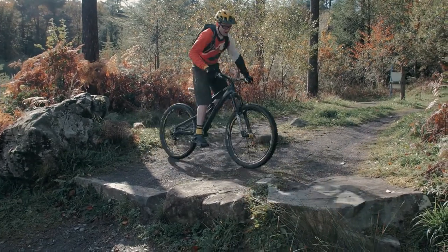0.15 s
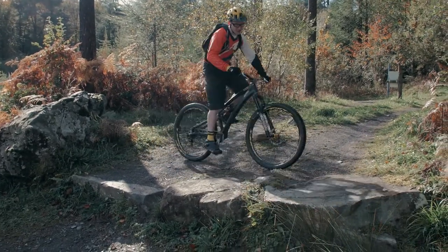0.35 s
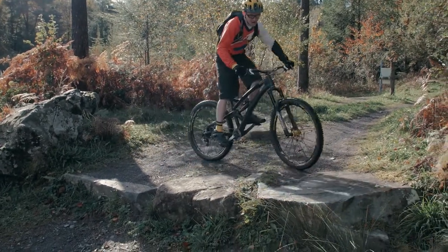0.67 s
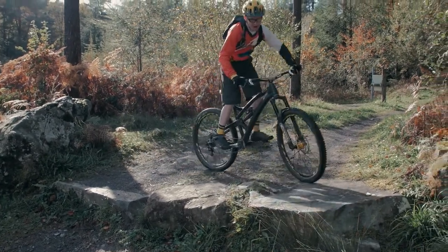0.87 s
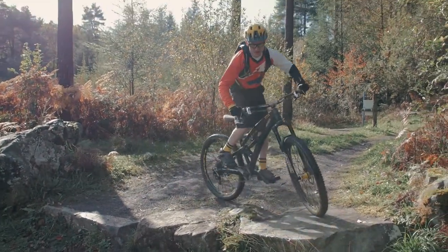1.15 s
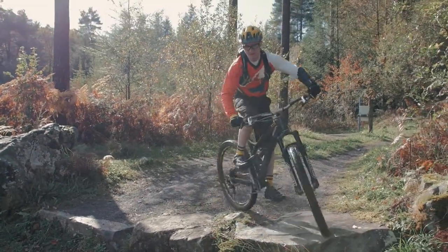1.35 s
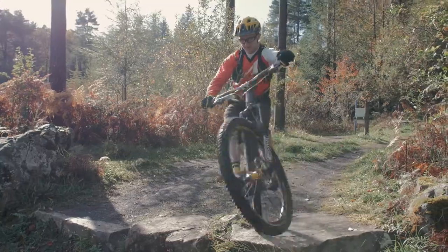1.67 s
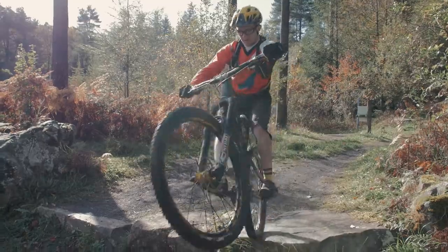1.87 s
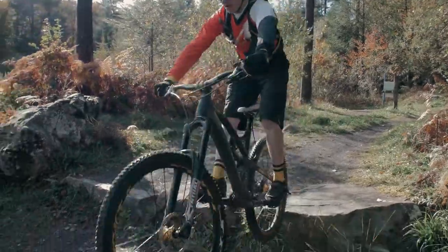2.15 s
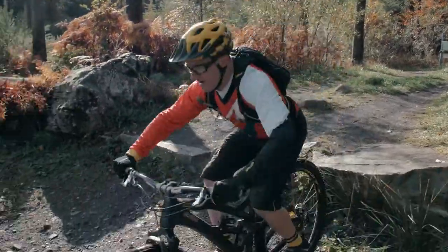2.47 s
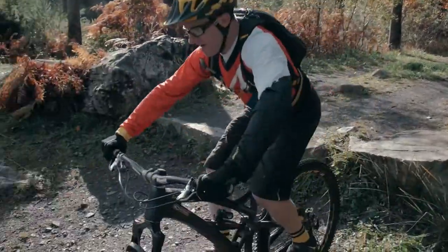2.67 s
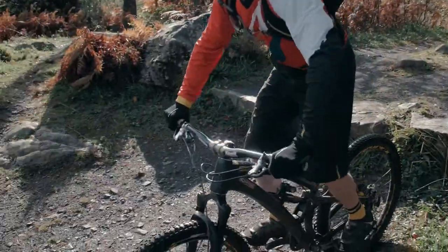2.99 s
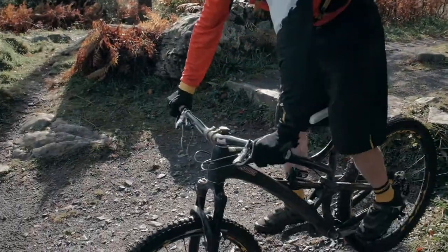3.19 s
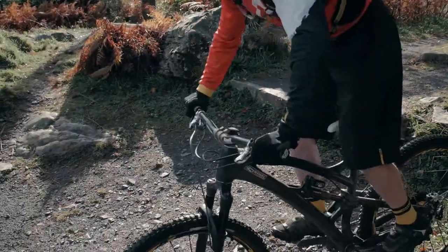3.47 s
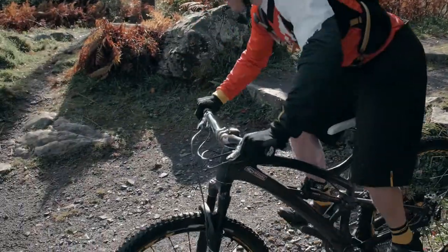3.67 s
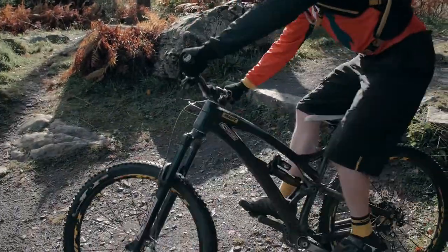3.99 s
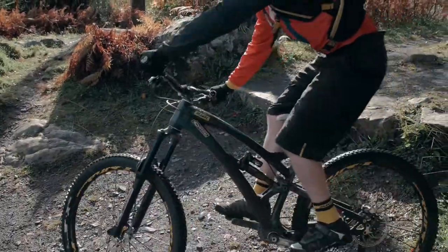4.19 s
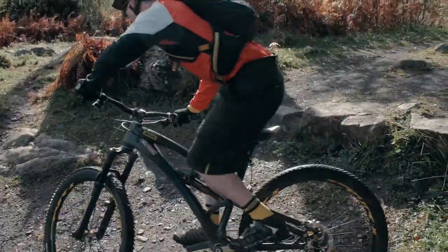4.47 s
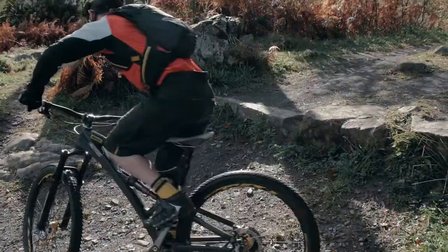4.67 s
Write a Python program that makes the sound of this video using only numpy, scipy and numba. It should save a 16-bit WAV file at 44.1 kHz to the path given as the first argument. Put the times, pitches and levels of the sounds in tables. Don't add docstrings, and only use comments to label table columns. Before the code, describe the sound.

Close outdoor pickup of a mountain bike on a rocky trail: fine gritty crackle and popping stones first, rapid faint freehub ticks, then a loud landing crack and thud with a quarter-second brake squeal. Afterwards the bike stumbles with several hard woody-metallic knocks, sparse gravel, a squeezed pebble, quick brake chirps, and soft tyre crunch. Faint air and leaves behind, little echo.

```python
import sys
import numpy as np
from scipy import signal
from scipy.fft import rfft, irfft
from scipy.io import wavfile
from scipy.ndimage import uniform_filter1d
from numba import njit

SR = 44100
rng = np.random.default_rng(int(sys.argv[2]) if len(sys.argv) > 2 else 0)


def wav_record(signal):
    frames = np.transpose(np.atleast_2d(signal))
    bounded = np.clip(frames, -1, 1)
    quanta = np.round(bounded * 32767).astype(np.int16)
    wavfile.write(sys.argv[1], SR, quanta)


def level_to_linear(level):
    exponent = np.asarray(level, float) / 20
    return 10 ** exponent


N = 213175
TIME = np.arange(N) / SR


def level(x, db):
    return x * level_to_linear(db) / np.sqrt(np.mean(x ** 2))


@njit
def svf(x, hz, width):
    y, b, l = np.empty(len(x)), 0., 0.
    g, k = np.tan(np.pi * hz / SR), width / hz
    for i in range(len(x)):
        v = (b + g * (x[i] - l)) / (1 + g * (g + k))
        b, l, y[i] = 2 * v - b, l + 2 * g * v, k * v
    return y


def band(x, hz, width):
    return svf(x, float(np.clip(hz, 15, .45 * SR)), float(max(width, 1)))


def band_twice(x, hz, width):
    return band(band(x, hz, width), hz, width)


def walk(rate, count=N):
    hold = int(SR / rate)
    steps = np.repeat(rng.standard_normal(count // hold + 1), hold)
    return 1.57 * uniform_filter1d(uniform_filter1d(steps, hold), hold)[:count]


def decay(t, t60):
    return np.exp(-np.log(1000) * t / t60)


def add(out, s, x):
    i = int(s * SR)
    out[i:i + len(x)] += x[:N - i]


def burst(t60, db, *bands, rise=.0006, blow=0., contact=1e-5):
    t = TIME[:int(SR * min(.2, 1.2 * t60 + .06))]
    push = rng.standard_normal(SR // 5)[:len(t)] * decay(t, max(t60, .002))
    push *= np.minimum(t / max(rise, 1e-4), 1)
    push += blow * np.exp(-((t - rise) / max(contact, 1e-5)) ** 2)
    push = np.convolve(push, signal.windows.hann(int(2 * contact * SR) + 3), "same")
    y = 0
    for k, (hz, width, gain_db) in enumerate(bands):
        y = y + (-1) ** k * level_to_linear(gain_db) * band(push, hz, width) / np.sqrt(width)
    return y * level_to_linear(db) / np.abs(y).max()


# pitch in Hz, level in dB per Hz.
WOOD_TONE = [(12, -29), (20, 20.5), (43, 9), (198, -7.5), (310, -13), (607, 4.5), (1570, -8.5), (3840, -25),
             (6720, -53), (8180, -9), (10500, -56), (13500, -51), (16000, -18)]


def wood():
    out, (f, g) = 0, np.transpose(WOOD_TONE)
    for hz in 22 * 2 ** np.arange(0, 9.6, .5):
        gust = np.clip(3.5 - np.log2(hz / 22), 1, 4) * 0.5 * walk(2.23)
        db = np.interp(np.log(hz), np.log(f), g) + gust
        out = out + level_to_linear(db) * band_twice(rng.standard_normal(N), hz, 0.43 * hz)
    return level(out, -54)


def grit(rate):
    size = level_to_linear(2.7 * np.minimum(rng.exponential(size=N), 3.6)) * rng.standard_normal(N)
    return level(size * (rng.random(N) < rate / SR), 0)


# time in seconds, load on the grit in dB, coarseness in dB.
ROLLING = [(0, -48.5, 2), (.142, -51, -1.5), (.286, -49.5, 5.5), (.5, -47, -3.5), (.86, -51, 4),
           (.99, -53.5, -2), (1.3, -50, -3), (1.47, -50.5, 0.5), (1.56, -55, -3), (1.96, -53, 0),
           (2.36, -58, 1.5), (2.8, -59.5, 8), (2.95, -49, 2), (3.3, -53, 0), (3.7, -48, 0),
           (4.1, -67.5, 15), (4.45, -48.5, -2.5), (4.83, -45.5, 2)]
# start in seconds, length in seconds, level in
# dB, coarseness in dB.
TREAD_SKIDS = [(0.228, 0.14, -61, -18), (.7, 0.16, -49.5, -7), (1.3, 0.2, -56, -5), (2.462, 0.3, -51, 13.5),
               (4.13, 0.019, -63, 5), (3.254, 0.03, -50, -3), (2.381, 0.026, -37, 13.5),
               (2.44, 0.075, -45, 16), (2.565, .16, -35.5, 2), (2.76, 0.017, -43, 7.5),
               (1.587, 0.3, -46.5, -3), (3.408, 0.13, -49, -2), (3.493, 0.076, -46, -8),
               (3.72, 0.13, -42, -1.5), (3.77, 0.099, -51.5, 19.5), (4.303, 0.055, -61, 23.5),
               (4.538, 0.14, -45, 4), (4.718, 0.042, -39, -2.5)]
# pitch in Hz, width in Hz, grains per second.
GRAIN_SIZES = [(363, 620, 1800), (1120, 1260, 700), (3420, 2250, 1100), (7400, 2400, 3900),
               (12800, 5000, 4600)]
# level in dB, share of the coarseness.
SIZE_LEVELS = [(-8, 1.4), (-0.9, 0.79), (-2.74, -0.83), (-12, 0.29), (-15.5, 0.43)]
SKID_SIZE_DB = [-5.5, 0.5, -1.2, 4, -1]


def tyres():
    s, load_db, coarse_db = np.transpose(ROLLING)
    common, bumps, out = grit(700), 1.1 * walk(35), 0
    near_db = 5 * np.tanh((TIME - 1.15) / 0.13)
    skid_rise_s, skid_fall_s = 0.013, 0.051
    for k, ((size_db, share), (hz, width, rate)) in enumerate(zip(SIZE_LEVELS, GRAIN_SIZES)):
        grains = grit(rate) + 0.46 * common + 0.83 * rng.standard_normal(N)
        tone = band_twice(grains, hz, 1.96 * width)
        force = level_to_linear(np.interp(TIME, s, load_db + share * coarse_db) + near_db * (k == 0))
        for start, length, db, rough_db in TREAD_SKIDS:
            rise, fall = (TIME - start) / skid_rise_s, (start + length - TIME) / skid_fall_s + 1
            shape = np.clip(np.minimum(rise, fall), 0, 1)
            force = np.hypot(force, shape * level_to_linear(db + share * rough_db + SKID_SIZE_DB[k]))
        out = out + level(tone, size_db) * force * level_to_linear(bumps + .9 * walk(18))
    return out


# start in seconds, peak in dB, pitch in Hz.
GRIT_CHIPS = [(0.004, -31, 1180), (0.016, -27, 2150), (0.037, -30, 1610), (0.113, -28, 1144),
              (0.17, -37, 1480), (0.184, -40, 3500), (0.252, -25, 1010), (0.271, -28, 3110),
              (0.325, -32, 1530), (0.349, -26, 3630), (0.359, -29, 3100), (0.388, -25, 3180),
              (0.496, -21, 1860), (0.625, -39, 2960), (0.698, -29, 1750), (0.733, -33, 3500),
              (0.75, -25, 3160), (0.854, -29, 1130), (0.87, -32, 3490), (0.888, -30, 3270),
              (0.923, -29, 3750), (0.979, -34, 4200), (1.008, -34, 1880), (1.094, -38, 966),
              (1.118, -32, 3000), (1.152, -31, 3990), (1.195, -37, 1100), (1.267, -34, 1280),
              (1.389, -24.5, 4810), (1.447, -29, 1450), (1.61, -30.5, 1150), (1.725, -32, 2600),
              (1.818, -27, 2850), (1.899, -38, 2560), (2.073, -27, 1390), (3.285, -30, 2050),
              (3.314, -42, 918), (3.401, -30, 1990), (3.413, -26, 2460), (3.445, -33, 2570),
              (3.465, -29, 2030), (4.605, -27, 991), (4.69, -28, 1800), (4.754, -25, 2050)]


def chips():
    out = np.zeros(N)
    for s, db, hz in GRIT_CHIPS:
        add(out, s, burst(0.015, db - 6, (hz, 0.27 * hz, 0), blow=1.4))
        snap = burst(.004, db - 13.5, (3400, 3600, 0), (9000, 6000, -14), rise=0.00019, blow=13.0)
        add(out, s, snap)
    return out


# start in seconds, peak in dB, pitch in Hz, sharpness in dB.
LEDGE_STONES = [(0.096, -28.5, 1130, -5), (0.238, -32, 1440, -3), (0.293, -32.5, 1130, 8.5),
                (0.414, -27.5, 3320, -18), (0.513, -23, 1980, 0), (0.541, -35, 1206, 0),
                (0.565, -25.5, 3450, -12), (0.657, -27, 3070, -18), (0.71, -30.5, 1230, -15),
                (0.806, -26.5, 3360, -10), (0.842, -26, 1160, -3), (0.909, -27.5, 3780, -11),
                (1.061, -33.5, 3400, -1), (1.24, -37, 1325, 8.5), (1.295, -31.5, 1120, -14),
                (1.346, -26, 1820, 6.5), (1.414, -44, 2830, 16), (1.472, -31.5, 1560, 5),
                (1.525, -28.5, 4100, -19), (1.596, -31, 2550, -11), (1.641, -31, 1280, 3.5),
                (1.736, -25, 2560, 5), (1.764, -25, 5200, -8), (1.8, -25.5, 3630, 0),
                (1.858, -26.5, 4470, -11), (1.878, -24, 1050, -16), (1.914, -29, 1560, 5.5),
                (2.054, -25.5, 2050, -0.5), (2.136, -28, 1430, -5), (2.165, -27, 4000, -14)]
# start in seconds, peak in dB, pitch in Hz, sharpness in dB.
LOWER_STONES = [(2.286, -34.5, 966, -28), (2.764, -24, 1110, -19), (2.864, -30.5, 2550, -11),
                (2.884, -31, 2740, -8), (2.79, -27.5, 2220, -6), (3.059, -25, 1450, -18),
                (3.119, -22, 640, -26.5), (3.271, -39, 2420, 6), (3.299, -41, 614, 5),
                (3.476, -28.5, 1900, -20.5), (3.675, -36.5, 1400, 9), (3.809, -28, 1300, -2.5),
                (3.82, -25, 2570, -9), (3.83, -19, 1290, -9.5), (3.835, -26, 1510, -16),
                (3.842, -30, 2400, -8), (3.847, -40, 1900, -6), (4.464, -28.5, 774, -1),
                (4.509, -25.5, 2640, -9), (4.524, -30.5, 800, 7), (4.579, -26, 2100, -1),
                (4.739, -26.5, 2010, 7)]


def stones():
    out = np.zeros(N)
    for table, t60, gain_db in ((LEDGE_STONES, 0.043, -4), (LOWER_STONES, 0.056, -2.1)):
        for s, db, hz, sharp_db in table:
            add(out, s, burst(t60, db + gain_db, (hz, 0.27 * hz, 0), blow=7.9))
            snap_db = db + 1.5 + sharp_db
            add(out, s, burst(.004, snap_db, (3500, 3500, 0), (9000, 6000, -18), rise=0.00017, blow=5.6))
    return out


# start in seconds, peak in dB, pitch in Hz, time to die by 60 dB in seconds.
PEBBLE = [
    (3.857, -23.5, 3950, 0.021),
    (3.87, -30, 4300, 0.05),
    (3.875, -28, 4400, 0.031),
    (3.883, -32, 5400, 0.046),
    (3.89, -37, 5840, 0.06),
    (3.893, -49.5, 7840, .03),
    (3.893, -39, 3770, 0.035),
]


def pebble():
    out = np.zeros(N)
    for s, db, hz, t60 in PEBBLE:
        add(out, s, burst(t60, db, (hz, 0.042 * hz, 0), rise=0.0011))
    return out


# start in seconds, peak in dB, pitch in Hz.
MORE_PAWL_TICKS = [(3.0624, -36, 9100), (3.943, -42, 8740), (3.9938, -45, 12400), (4.0033, -46, 12700),
                   (4.027, -32, 13000), (4.0582, -47, 8670), (4.0886, -48, 9530), (4.0954, -44, 8500),
                   (4.2213, -41, 12700), (4.2344, -57, 8820), (4.3131, -50, 8790), (4.3321, -45, 8900),
                   (4.3929, -56, 8690), (4.426, -37, 8300), (4.4794, -45, 9100), (4.5704, -52, 8520),
                   (4.6074, -42, 8690)]


def more_pawls():
    out = np.zeros(N)
    for s, db, hz in MORE_PAWL_TICKS:
        add(out, s, burst(0.018, db - 2.5, (hz, 1500, 0), (13000, 5000, -1.5), (6000, 4000, -9)))
    return out


# start in seconds, peak in dB.
FREEHUB_TICKS = [(1.951, -43), (1.9767, -43), (2.014, -45), (2.053, -42), (2.0832, -43), (2.1116, -43),
                 (2.142, -44), (2.173, -47.5), (2.2039, -42), (2.239, -40), (3.6037, -40), (3.64, -40),
                 (3.683, -36), (3.7155, -36)]


def freehub():
    out = np.zeros(N)
    for s, db in FREEHUB_TICKS:
        add(out, s, burst(0.057, db + 2.0, (8600, 1800, -7), (13200, 4500, 3), (4500, 4000, -12)))
    return out


# start in seconds, peak in dB, pitch in Hz.
SOFT_BUMPS = [(0.018, -51, 122), (1.368, -61, 528), (1.496, -50.5, 163), (1.549, -42, 570),
              (1.611, -46, 330), (1.874, -43.5, 256), (1.98, -55, 630), (2.135, -45, 314),
              (2.163, -40, 600), (2.204, -45, 369), (2.639, -22.5, 564), (3.165, -34.5, 505),
              (3.239, -42, 549), (3.366, -44, 748), (3.386, -43, 664), (3.799, -41, 583), (4.613, -40, 480)]
# start in seconds, peak in dB, pitch in Hz, time to die by 60 dB in seconds.
TYRE_THUMPS = [
    (2.386, -28, 67, 0.17),
    (2.394, -14.5, 254, 0.05),
    (4.302, -33.5, 108, 0.092),
    (4.746, -36.5, 124, 0.2),
]


def thumps():
    out = np.zeros(N)
    for s, db, hz, t60 in TYRE_THUMPS:
        add(out, s, burst(t60, db, (hz, .5 * hz, 0), rise=0.00287, blow=12, contact=0.001))
    for s, db, hz in SOFT_BUMPS:
        add(out, s, burst(.05, db + 2.5, (hz, 0.18 * hz, 0), rise=0.0025, blow=4.1, contact=0.00027))
    return out


# start in seconds, peak in dB, pitch in Hz, thud in dB, crack in dB.
LANDING_BLOWS = [(2.373, -25.5, 668, -10, -12), (2.39, -9.5, 586, -20, -40.5),
                 (2.418, -0.5, 1640, -38, -13), (2.684, -8, 860, -34, -26), (2.701, -18, 1200, -30, -1),
                 (2.707, -11.5, 1880, -45, -6.5), (2.712, -25, 2300, -40, -15),
                 (2.735, -15, 1710, -42, -10), (2.739, -21.5, 555, -37, -2), (4.021, -25, 550, -25, -8),
                 (4.29, -22, 554, -26, -34), (4.313, -21.5, 1600, -11, -13), (4.736, -32, 2000, -6, 0)]
# start in seconds, peak in dB, pitch in Hz, thud in dB,
# crack in dB.
FRAME_KNOCKS = [(2.975, -5.5, 1185, -35, -14.5), (3.077, -27, 534, -33, -11.5),
                (3.084, -1, 1260, -52, -9.5), (3.187, -25.5, 330, -18, -11.5), (3.555, 0.5, 1080, -53, -10),
                (3.734, -25.5, 666, -14, -2.5), (3.781, 0.5, 1110, -58, -1), (3.86, -17, 1390, -32, -24),
                (3.895, -47, 1390, -22, -16), (4.039, -31.5, 484, -39, -25), (4.124, -20.5, 1490, -34, -13),
                (4.145, -24, 525, -33, -31.5)]
# pitch in Hz, width in Hz, level in dB.
FRAME_TUBES = [(939, 115, -0.5), (1263, 14, -19), (1465, 57, -4), (2950, 720, 0), (800, 70, -16.5),
               (4080, 68, -53)]


def knocks():
    out = np.zeros(N)
    for table, t60 in ((LANDING_BLOWS, 0.051), (FRAME_KNOCKS, 0.045)):
        for s, db, hz, thud_db, crack_db in table:
            body = burst(0.49 * t60, db + 0.5, *FRAME_TUBES, (hz, 0.22 * hz, 0),
                         rise=0.00139, blow=1.83, contact=.00009)
            add(out, s, band(body, np.sqrt(1300 * hz), 1040))
            rattle = burst(1.5 * t60, db - 14.5, (1400, 1800, 0), (5000, 5000, -12))
            add(out, s, rattle)
            thud = burst(4.3 * t60, db + thud_db, (90, 90, -3), (250, 200, 0), blow=2.2, contact=0.000063)
            add(out, s, thud)
            crack = burst(0.5 * t60, db + crack_db, (4200, 3500, 0), (8700, 1200, -1.5), (12500, 4000, -6),
                          rise=0.0017, blow=4.2)
            add(out, s, crack)
    rim_on_rock = burst(0.049, -1.6, (600, 500, 0), (2000, 900, -6), (290, 160, -3),
                        rise=0.001485, blow=3.7, contact=.00008)
    add(out, 2.3935, rim_on_rock)
    return out


ROTOR_NOTES_HZ = [478, 488, 549, 620, 754, 808, 840, 1098, 1190, 1233, 1375, 1485, 1575, 1815]
# start in seconds,
# damped at in seconds, level in dB, time to die by 60 dB in seconds.
ROTOR_RINGS = [
    [(4.13, 4.182, -30, 0.14)],
    [(2.74, 2.96, -36.5, 0.78), (3.58, 3.73, -47.5, 1.2), (3.87, 4.05, -46.5, 0.77)],
    [(2.28, 2.37, -40.5, 0.14), (2.69, 2.97, -34.5, 0.96), (3.1, 3.15, -36, 0.5), (3.27, 3.33, -52, 0.56),
     (3.42, 3.5, -51, 0.55), (4.283, 4.307, -30.5, 0.57)],
    [(0.543, .7, -53, 0.99), (2.99, 3.0, -29, 0.29)],
    [(2.769, 2.964, -40, 1.1)],
    [(4.38, 4.445, -30.5, 0.38), (4.445, 4.515, -42.5, 1), (4.53, 4.59, -44, 0.49)],
    [(2.67, 2.704, -26, 0.3)],
    [(2.741, 2.975, -35, 0.8)],
    [(3.57, 3.72, -65, .6), (3.82, 3.94, -43, 0.81)],
    [(2.767, 2.96, -40.5, 0.52)],
    [(3.57, 3.72, -46, 0.76), (3.8, 4.02, -40, 0.71)],
    [(4.385, 4.515, -41.5, 0.67)],
    [(3.576, 3.7, -45, 0.46)],
    [(2.5, 2.526, -12, 0.17), (2.998, 3.004, -34, 0.09)],
]


def rotor():
    out = np.zeros(N)
    for hz, strikes in zip(ROTOR_NOTES_HZ, ROTOR_RINGS):
        for s, stop, db, t60 in strikes:
            t = np.arange(0, stop - s + 0.025, 1 / SR)
            shape = np.minimum(t / 0.0011, 1) * np.clip((t[-1] - t) / 0.042, 0, 1) * decay(t, t60)
            phase = 2 * np.pi * hz * np.cumsum(1 + 0.003 * walk(31.0, count=len(t))) / SR
            add(out, s, level_to_linear(db + 2.2 * walk(30, count=len(t))) * shape * np.sin(phase))
    return out


# time in seconds, slips per second in Hz, level in dB,
# bite in dB added from the 3rd multiple up.
BRAKE_SQUEALS = [
    [(0.452, 576, -46, -11), (0.466, 594, -31, 4.5), (0.482, 584.4, -36.5, 14.5),
     (0.498, 605.4, -30.5, 0.5), (0.52, 630, -28.5, -9), (0.542, 673, -54, -4)],
    [(2.435, 500, -20, -11), (2.447, 499, -23, -10), (2.473, 557.8, -23, -4), (2.507, 580.6, -21.5, -4),
     (2.54, 587, -26.5, 7), (2.59, 582.2, -22, 1), (2.635, 586.5, -26.5, 6.5), (2.689, 558, -26.5, 3),
     (2.695, 566.7, -32, -5)],
    [(2.995, 575, -37, -2), (3.012, 565, -35, -4), (3.035, 558, -36, -3), (3.058, 553, -40, -5)],
    [(4.225, 774, -53, -9), (4.243, 744, -25, -5), (4.27, 717, -30.5, 0.5), (4.297, 726, -34, -16)],
    [(4.333, 744, -35, -27), (4.353, 747.5, -30.5, 6), (4.385, 778, -31, -1.5)],
]
# share of pitch scatter, extra dB per upper multiple, chatter in seconds,
# 2nd multiple in dB, rasp in dB.
PAD_SLIP = [
    (0.002, -2.6, 0.00104, -13.5, -20),
    (0.002, -0.3, 0.06, -0.7, -11),
    (0.004, 0.2, 0.0015, 0.5, -8),
    (0.002, -0.45, .001, -1.8, -16),
    (0.002, -1.1, 0.0016, 1.9, -18),
]
# pitch in Hz, level in dB.
CALIPER_TONE = [(520, -9.5), (620, -5), (760, -0.5), (1150, -4), (1480, 4.5), (1760, -2), (2250, -10.5)]
# number of the multiple, level in dB.
UPPER_MULTIPLES = [(4, -3.5), (6, -6), (8, -13.5), (11, -17), (16, -25), (24, -73)]
# time in seconds, 2nd multiple in dB,
# 3rd multiple in dB.
MODE_TRADE = [(2.45, -5, 1.5), (2.49, 5.5, 8.5), (2.512, 6.5, 11), (2.545, 4, 6.5), (2.582, 5, -6),
              (2.626, -1, 5.5), (2.64, 0, 2), (2.654, 6, 5), (2.678, 13, -5)]


def brake():
    out, (f, g), trade = np.zeros(N), np.transpose(CALIPER_TONE), np.transpose(MODE_TRADE)
    for table, (rough, slope_db, chatter, even_db, rasp_db) in zip(BRAKE_SQUEALS, PAD_SLIP):
        s, *cols = np.transpose(table)
        t = np.arange(s[0], s[-1], 1 / SR)
        n = len(t)
        hz, grip_db, bite_db = (np.interp(t, s, c) for c in cols)
        loose = t - t[0] < chatter
        tremble = rough * (1 + 2.4 * loose) * walk(89.6, count=n)
        phase = 2 * np.pi * np.cumsum(hz * (1 + tremble)) / SR
        edge = np.clip(np.minimum(t - t[0], t[-1] - t) / .008, 0, 1)
        edge = edge * level_to_linear(3.2 * loose * walk(160, count=n))
        rasp = band_twice(rng.standard_normal(n) * (1 + np.cos(phase)), 1180, 1700)
        add(out, s[0], level(rasp, rasp_db) * edge * level_to_linear(grip_db + 2.3 * walk(75.4, count=n)))
        for k in range(1, 21):
            if k < 4:
                db = grip_db + np.interp(np.log(k * hz), np.log(f), g)
                db = db + bite_db * (k == 3) + even_db * (k == 2)
                if k > 1 and s[0] < trade[0, 0] < s[-1]:
                    db = db + np.interp(t, trade[0], trade[k - 1])
            else:
                upper_db = np.interp(k, *np.transpose(UPPER_MULTIPLES)) - 11
                db = grip_db + 0.94 * bite_db + upper_db + slope_db * (k - 5)
            flutter = (.4 + .33 * min(k, 8) + 100 * rough + 1.6 * (k == 1)) * walk(90, count=n)
            drift = 2 * np.pi * rng.random() + 1.3 * level_to_linear(rasp_db) * k * walk(117.1, count=n)
            add(out, s[0], np.sqrt(2) * edge * level_to_linear(db + flutter) * np.cos(k * phase + drift))
    return out


def scene():
    small_parts = chips() + stones() + pebble() + more_pawls() + freehub()
    bike = small_parts + thumps() + knocks() + rotor() + brake()
    t = TIME[:SR // 2]
    scatter = rng.standard_normal(len(t)) * decay(t, 0.25) * (t > .004)
    echo = signal.fftconvolve(bike, band(scatter, 1430, 4340) / np.sqrt(SR))[:N]
    return (wood() + tyres() + bike + level_to_linear(3.5) * echo)[None]


def top_cut(x):
    return signal.sosfilt(signal.butter(12, 16790, fs=SR, output="sos"), x)


# pitch in Hz, level in dB.
MICROPHONE_TONE = [(20, -1), (5500, -0.5), (6800, -3.5), (8600, 2), (9600, -4), (11000, -3), (13000, -2),
                   (15700, -5), (16200, -28), (22000, -64)]


def record(dry):
    hz, db = np.transpose(MICROPHONE_TONE)
    colour = level_to_linear(np.interp(np.log(np.fft.rfftfreq(N, 1 / SR) + 1), np.log(hz), db))
    heard = irfft(rfft(dry) * colour, N)
    rounded = np.tanh(.7 * heard) / .7
    return top_cut(rounded)


dry = scene()
out = record(dry)
wav_record(out)
```